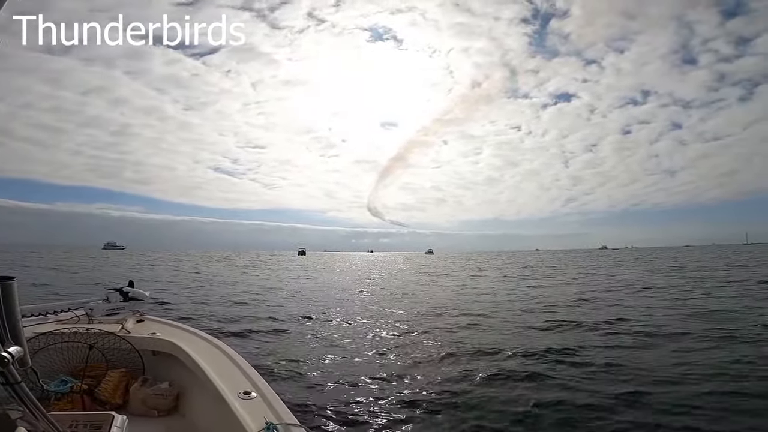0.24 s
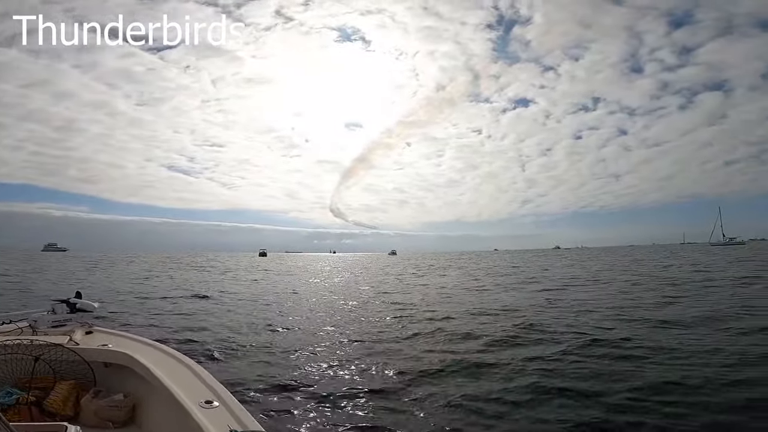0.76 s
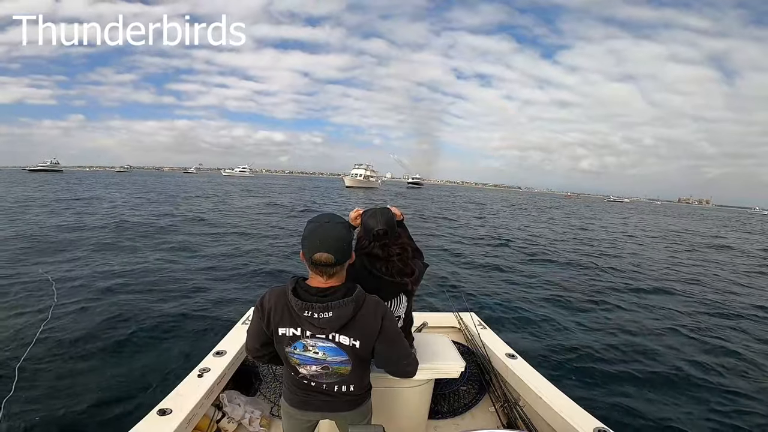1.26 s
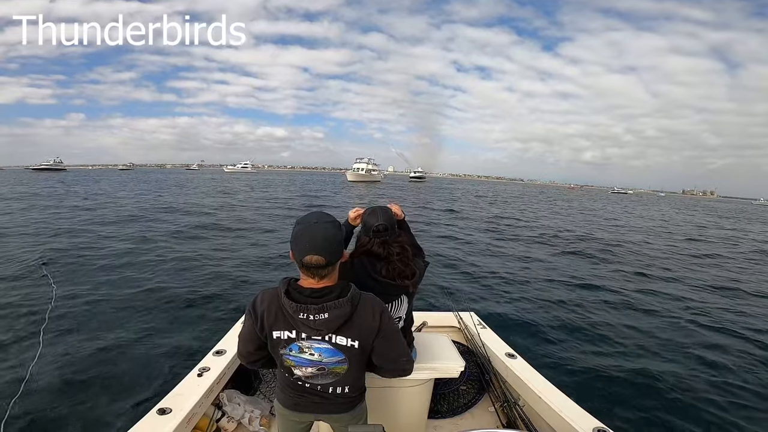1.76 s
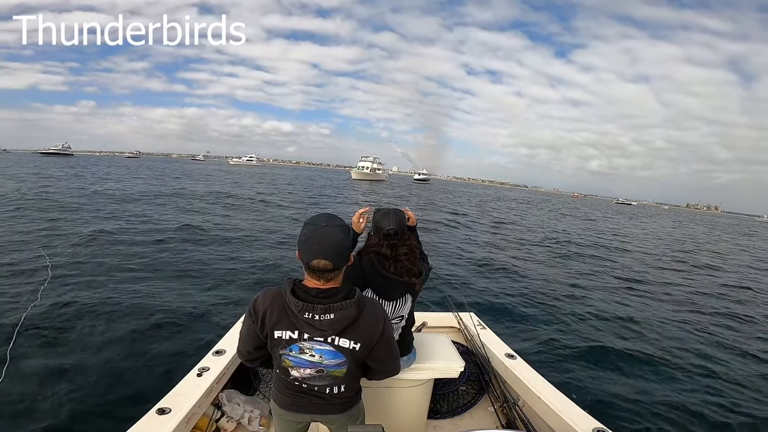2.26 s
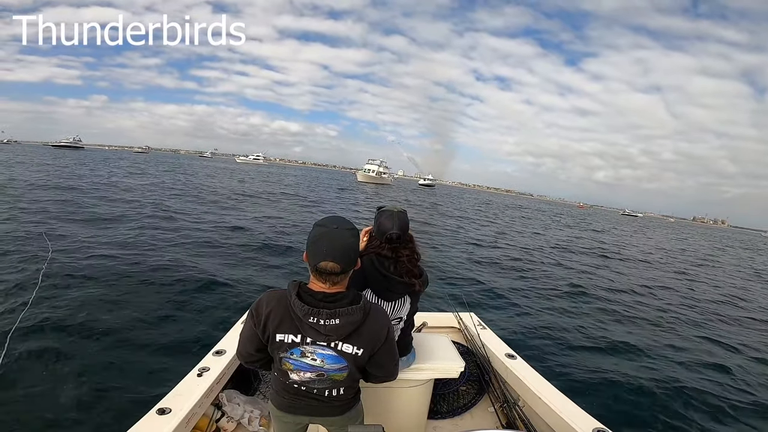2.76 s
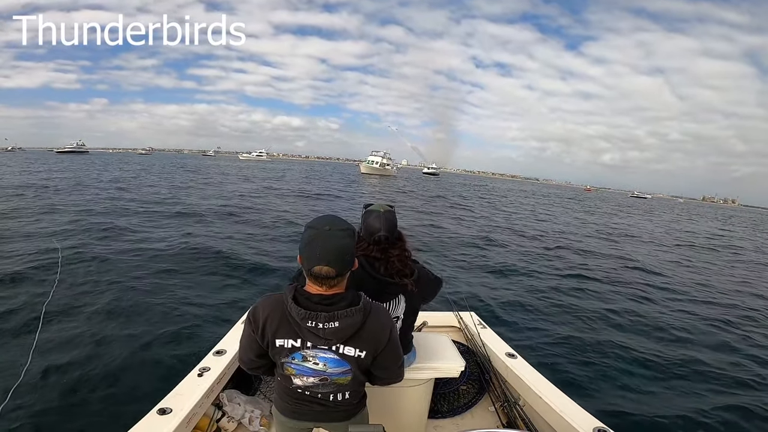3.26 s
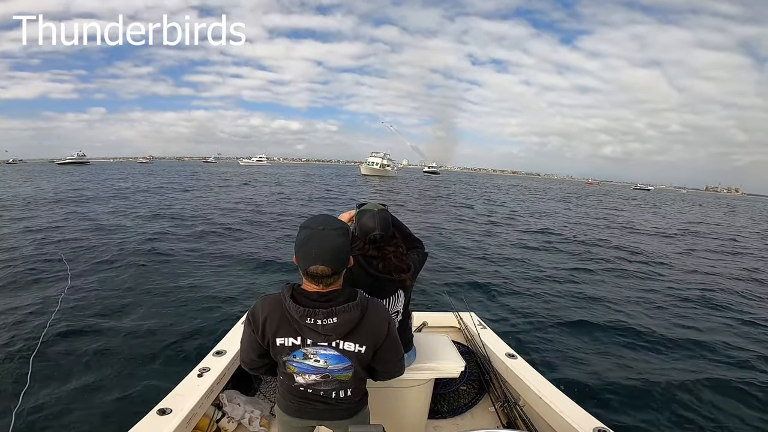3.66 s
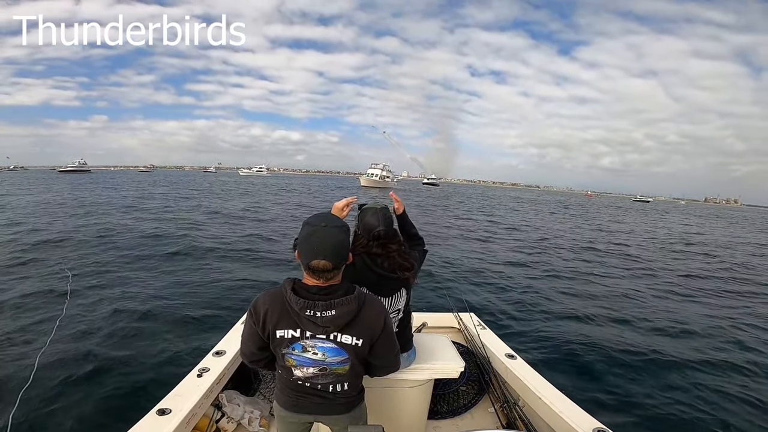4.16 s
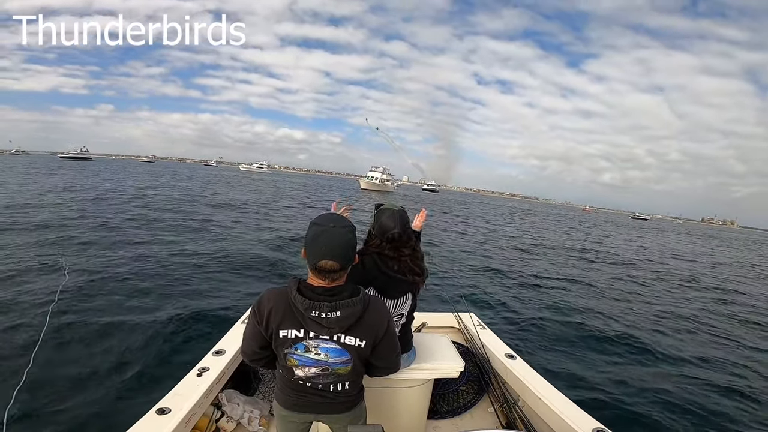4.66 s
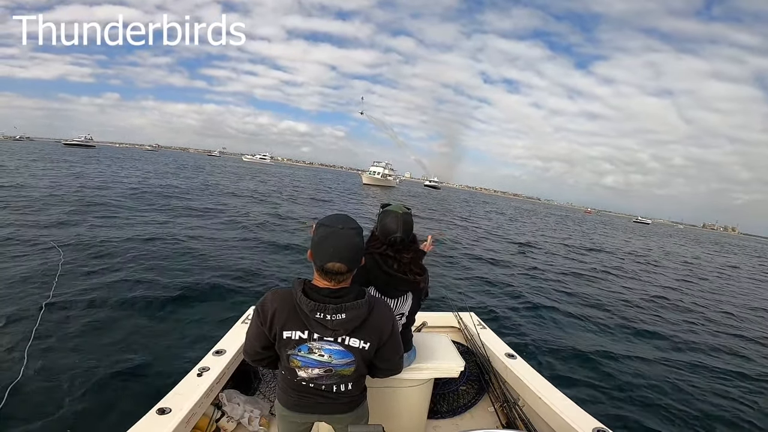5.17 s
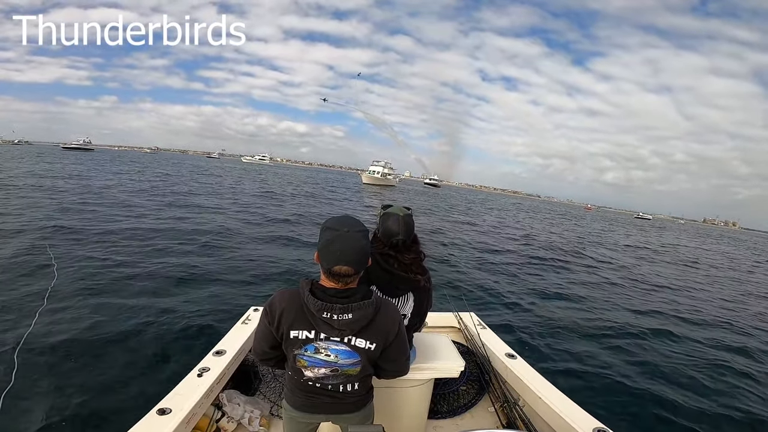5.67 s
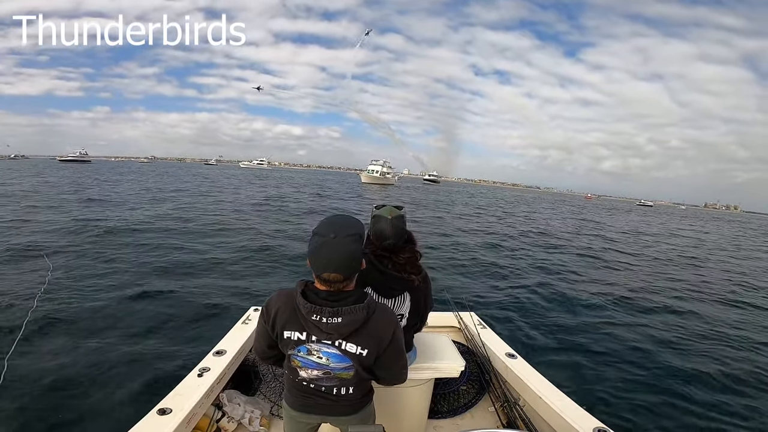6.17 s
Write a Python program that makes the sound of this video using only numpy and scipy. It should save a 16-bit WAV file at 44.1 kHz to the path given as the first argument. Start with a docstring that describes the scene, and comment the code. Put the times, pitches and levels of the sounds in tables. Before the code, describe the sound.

A jet's deep rumble cuts off abruptly; water slaps a small boat over far rumbling, then jets close in with howling, crackling roar.

```python
"""A jet rumbles away; then the scene changes and, heard from a small open boat, more jets close in at an air
show. Water laps at the hull throughout, with slaps, gulps of air and taps of loose gear over a far rumble. Jet
exhaust is filtered noise that swells and brightens; trains of pressure spikes add a harsh crackle. Unsteady
resonances make howls that mostly fall in pitch. A delayed copy of the roar and crackle, mirrored by the sea,
sweeps a comb-like hollowness through them as the jets climb."""
import sys
import numpy as np
from scipy import signal
from scipy.fft import rfft, irfft, next_fast_len
from scipy.io import wavfile
from scipy.ndimage import uniform_filter1d, minimum_filter1d, map_coordinates

SR = 44100
rng = np.random.default_rng(int(sys.argv[2]) if len(sys.argv) > 2 else 0)


def dump_mix(stems):
    """Bounce the given channels to the path in sys.argv[1] as a 16-bit WAV at rate SR."""
    frames = np.atleast_2d(stems).T  # one column per channel
    limited = np.clip(frames, -1, 1)  # hard clip at full scale
    pcm = np.round(limited * 32767).astype(np.int16)
    wavfile.write(sys.argv[1], SR, pcm)


N = 283122  # samples, about 6.42 s
TIME = np.arange(N) / SR  # s
CUT_S = 1.09  # the scene changes from the departing jet to the approach

# flight path: (time [s], elevation [degrees], average share of the sound that the sea mirrors [0-1])
CLIMB = [(0, 2, 0.28), (4.6, 7.4, 0.0023), (5.25, 4.3, 0.24), (5.55, 6.65, 0.28), (5.8, 7.8, 0.34),
         (6.0, 9.84, 0.32), (6.15, 12.24, 0.55), (6.42, 17.2, 0.7)]


def undb(db):
    """Turn decibels into gain."""
    return 10 ** (np.asarray(db) / 20)


def curves(table):
    """Draw each column after the time column as a curve with one value per sample."""
    s, *columns = np.transpose(table)
    return [np.interp(TIME, s, c) for c in columns]


def during(start_s, end_s, fade_s):
    """Stay at one from start to end, fading in before and out after."""
    outside = np.maximum(start_s - TIME, 0) + np.maximum(TIME - end_s, 0)
    return np.exp(-(outside / fade_s) ** 2)


def colour(x, points):
    """Filter a sound to follow a spectrum of (frequency [Hz], level [dB]) points."""
    hz, db = np.transpose(points)
    size = next_fast_len(N)
    f = np.maximum(np.fft.rfftfreq(size, 1 / SR), 1)
    # fall away below the first point and above the last
    beyond = np.minimum(f / hz[0], 1) ** 2 * np.minimum(hz[-1] / f, 1) ** 4
    gain = undb(np.interp(np.log(f), np.log(hz), db)) * beyond
    return irfft(rfft(x, size) * gain, size)[..., :N]


def band(x, lo_hz, hi_hz):
    """Keep one band of frequencies, without phase shift."""
    sos = signal.butter(4, [lo_hz, hi_hz], "band", fs=SR, output="sos")
    return signal.sosfiltfilt(sos, x)


def unit(x, lo_hz, hi_hz):
    """Scale a sound so that the given band has an rms level of 1."""
    return x / np.std(band(x, lo_hz, hi_hz))


def noise(points):
    """Make turbulent noise with the given spectrum."""
    return colour(rng.standard_normal(N), points)


def walk(rate):
    """Wander smoothly at random with spread 1, changing about rate times a second."""
    knots = rng.standard_normal(4096)
    x = map_coordinates(knots, [TIME * rate], order=3, mode="wrap")
    return x / np.std(x)


def sway(rate):
    """Wander at random in both strength and phase."""
    return walk(rate) + 1j * walk(rate)


def delayed(x, seconds):
    """Play the sound a little later; the delay may move."""
    return map_coordinates(x, [np.arange(N) - seconds * SR], order=3)


def air(x, treble_db, flutter_db, knee_hz=2400, span_hz=3300, most_db=4):
    """Air tilts the treble above a knee; eddies on the way make neighbouring bands flutter together."""
    f, t, z = signal.stft(x, SR, nperseg=512)
    tilt = np.outer(np.maximum(f - knee_hz, 0) / span_hz, np.interp(t, TIME, treble_db))
    tilt = np.minimum(tilt, most_db)  # limit how much treble can be raised
    places = np.meshgrid(np.sqrt(f / 250), t * 16, indexing="ij")
    eddies = map_coordinates(rng.standard_normal((64, 256)), places, order=3, mode="wrap")
    return signal.istft(z * undb(tilt + flutter_db * eddies), SR)[1][:N]


def departing_jet():
    """Seen from behind, the exhaust is a deep rumble under a dull roar that brightens and swells once."""
    # exhaust spectrum: (frequency [Hz], level [dB])
    exhaust_colour = [(15, -42), (25, -15), (88, 3.5), (128, 1.5), (246, -3), (344, -3.5), (402, -11),
                      (576, -14.5), (862, -35), (1290, -35.5), (1730, -42.5), (2160, -47), (3460, -62.5),
                      (5290, -94.5), (6880, -113), (11600, -120)]
    rumble_db, roar_db = -13.5, -35
    swell_db, swell_treble_db = 1.2, 5
    sinks_from_s, sink_db_per_s, brighten_db_per_s = 0.65, 8, 3
    swell = during(0.42, 0.68, fade_s=0.16)
    sink_db = sink_db_per_s * np.maximum(TIME - sinks_from_s, 0)
    treble_db = swell_treble_db * swell + brighten_db_per_s * np.minimum(TIME, CUT_S)
    plume = air(noise(exhaust_colour), treble_db, flutter_db=1.4, knee_hz=1200)
    low = band(plume, 13, 787)
    high = unit(plume - low, 900, 3500) * undb(roar_db + swell_db * swell)
    low = unit(low, 60, 500) * undb(rumble_db)
    return (low + high) * undb(-sink_db)


def lapping(grain_db=2, ripple_db=-62.0, slosh_db=3.0, lee_db=-4):
    """Small ripples fizz along the hull, and now and then a wavelet slaps it."""
    # water on the hull: (time [s], bubble pitch [Hz], level [dB], left minus right [dB], decay [s])
    hull_slaps = [(1.154, 1680, -38, 9, 0.022), (1.222, 3350, -45, 3, .008),
                  (1.426, 3600, -40.5, 1, 0.0046), (1.49, 2800, -45, 8, .005),
                  (1.554, 3240, -40, 4, 0.0075), (1.603, 4870, -45, 5, 0.017), (1.713, 2380, -44, 7, 0.017),
                  (1.737, 1400, -35, 3, 0.0063), (1.889, 2650, -43, 5, 0.032), (1.94, 3000, -42, 1, 0.047),
                  (2.011, 3840, -40.5, 6, 0.0096), (2.021, 1490, -32.5, 3, 0.03),
                  (2.06, 4200, -48, 1, .004), (2.172, 4160, -51, 7, 0.016), (2.373, 1900, -39, 1, 0.009),
                  (2.391, 2005, -39, 2, 0.0077), (2.401, 2200, -41.5, -2, 0.0047),
                  (2.469, 5500, -50, 6, 0.0067), (2.48, 2120, -41, 2, .007),
                  (2.512, 1750, -38.5, 15, 0.027), (2.535, 2560, -30, 7, 0.015),
                  (2.576, 4500, -39, 4, 0.018), (2.593, 2900, -33.5, 8, 0.012),
                  (2.636, 1300, -37, 3, 0.009), (2.655, 2100, -38, 6, .016), (2.788, 5355, -44, 3, .012),
                  (2.793, 2200, -40.5, 4, 0.037), (2.852, 1220, -35.5, 1, 0.0033),
                  (2.902, 2630, -44, 9, 0.024), (3.214, 2970, -43.5, 6, 0.0042),
                  (3.302, 2200, -36.5, 1, 0.023), (3.335, 1960, -24, 0, 0.022),
                  (3.373, 2650, -30, 2, 0.028), (3.485, 3100, -43, 3, 0.029), (3.55, 2830, -46, 3, 0.031),
                  (3.624, 3170, -39, 8, 0.013), (3.65, 4270, -55, 1, 0.028),
                  (3.846, 2810, -32.5, 6.5, 0.026), (3.897, 4130, -39, 3, 0.015),
                  (3.965, 4300, -44, 3, .008), (4.034, 4500, -43.5, 3, 0.026),
                  (4.118, 4800, -46, -2, 0.0025), (4.86, 6170, -44, -3, 0.0044)]
    # spectrum of the fizz: (frequency [Hz], level [dB])
    spray_colour = [(400, -13), (1000, 1), (1800, -0.5), (3300, -6), (5000, -8), (8000, -15.5),
                    (12000, -31.5)]
    # tone of the water heard past the boat's raised side: (frequency [Hz], level [dB])
    splash_shade = [(200, 8), (4500, -4), (6000, -6), (8000, -8), (11000, -17)]
    drops = rng.standard_normal((2, N)) * undb(grain_db * walk(600))
    sides = colour(drops, spray_colour)
    fizz = np.array([air(side, 0 * TIME, flutter_db=2.5) for side in sides])
    # the fizz is fainter during the departure
    fizz_db = ripple_db + slosh_db * walk(14) + lee_db * (TIME < CUT_S)
    water = unit(fizz, 1500, 8000) * undb(fizz_db)
    for s, hz, db, pan_db, decay_s in hull_slaps + wavelets():
        start = int(s * SR)
        side_db = np.array([[pan_db], [-pan_db]]) / 2
        splash = slap(hz, max(decay_s, .002), db)[:, :N - start] * undb(db + side_db)
        water[:, start:start + splash.shape[1]] += splash
    return colour(water, splash_shade)


def port_wind(level_db=-41):
    """A light breeze buffets each microphone separately with low noise."""
    wind_colour = [(18, -12.5), (40, 5), (100, -7.0), (300, -30.5)]  # (frequency [Hz], level [dB])
    gusts = np.array([noise(wind_colour) for _ in range(2)])
    return gusts / np.std(gusts) * undb(level_db + 2 * walk(1.0))


def howl(peak_s, rise_s, hold_s, fall_db_per_s, level_db, peak_hz, final_hz, glide_s,
         width_hz, octave_db, roughness, skirt_width=3.2):
    """Turbulence drives an engine resonance and its octave, which settle in pitch as the jet turns by."""
    age = TIME - peak_s
    bend = np.exp(-np.maximum(age, -2 * rise_s) / glide_s)
    hz = final_hz + (peak_hz - final_hz) * bend
    fall_db = fall_db_per_s * np.maximum(age - hold_s, 0)
    envelope = during(peak_s, TIME[-1], rise_s) * undb(level_db - fall_db)
    turn = np.exp(2j * np.pi * np.cumsum(hz) / SR)
    core = sway(width_hz)
    # a clean resonance saturates, which evens out its swells
    core = core / (0.18 + np.abs(core)) ** np.clip(1 - 2 * roughness, 0, 1)
    skirts = sway(skirt_width * width_hz)  # faster wandering spreads the tone wider
    tone = (core / np.std(core.real) + roughness * skirts) * turn
    tone = tone + undb(octave_db) * skirts * turn ** 2
    return tone.real / np.hypot(1, roughness) * envelope


def elevation():
    """Give the sine of the jets' angle above the horizon."""
    return np.sin(np.radians(curves(CLIMB)[0]))


def far_rumble(level_db=-23.5, waver_db=-1, overhead_db=10.5):
    """Mostly the bass of distant jets carries over the water; it grows as they rise in the sky."""
    # bass-heavy spectrum of the far jets: (frequency [Hz], level [dB])
    rumble_colour = [(22, -17.5), (42, -3), (71, -4.5), (125, 0), (155, -1.5), (182, -6.5), (222, -7),
                     (270, -13), (400, -25), (600, -36), (1000, -44), (2200, -56.5), (4000, -66.5),
                     (7000, -88.5)]
    moving_db = level_db + waver_db * walk(9.7) + overhead_db * elevation()
    rumble = air(noise(rumble_colour), 0 * TIME, flutter_db=1.5)
    return unit(rumble, 30, 320) * undb(moving_db)


def wavelets(count=24, until_s=3.4, level_db=-53, scatter_db=2, pitch_hz=2000, decay_s=0.0099):
    """Faint slaps fall at random, in rows like those of the hull slaps."""
    times = rng.uniform(CUT_S, until_s, count)
    chance = np.clip(rng.standard_normal((count, 4)), -2, 2)
    rows = []
    for s, (a, b, c, d) in zip(times, chance):
        hz = pitch_hz * np.exp(0.47 * a)
        rows.append((s, hz, level_db + scatter_db * b, 4 * c, decay_s * np.exp(.5 * d)))
    return rows


def slap(hz, decay_s, level_db, bubbles_db=-1.5, spray_db=-5, splash_hz=700):
    """A gentle wavelet rings bubbles around one pitch; a hard one foams, scattering them in broad spray."""
    foam_from_db, foam_range_db, foam_shift_db = -48.5, 20, 4  # harder slaps trade bubbles for spray
    count, cycles = 22, 4.5  # bubbles, and how many turns each rings before fading to about a third
    foam = np.clip((level_db - foam_from_db) / foam_range_db, 0, 1)
    born = decay_s * rng.exponential(size=(count, 1))
    scatter = np.clip(rng.standard_normal((count, 1)), -2, 1.5)
    pitch = hz * np.exp((.16 + 0.23 * foam) * scatter)
    age = TIME[:6144]
    turns = np.maximum(age - born, 0) * pitch
    ringing = np.sin(2 * np.pi * turns) * np.exp(-turns / cycles) * (1 - np.exp(-turns))
    bubbles = np.sum(ringing * np.exp(-born / (2 * decay_s)), axis=0)  # later bubbles are weaker
    edges_hz = [min(hz / 3.5, splash_hz), min(hz * 1.5, 9000)]
    body = signal.butter(2, edges_hz, "band", fs=SR, output="sos")
    spray = signal.sosfilt(body, rng.standard_normal((2, len(age))))
    spray = spray * (1 - np.exp(-7 * age / decay_s)) * np.exp(-age / decay_s)
    return (undb(bubbles_db - foam_shift_db * foam) * bubbles / np.max(np.abs(bubbles))
            + undb(spray_db + foam_shift_db * foam) * spray / np.max(np.abs(spray)))


def gulps(glide=0.76, attack_s=0.00049):
    """Air trapped under the hull by a wave rings briefly, rising in pitch."""
    # air pockets: (time [s], starting pitch [Hz], level [dB], decay [s])
    air_pockets = [(1.157, 588, -31, 0.011), (2.025, 544, -30, 0.011), (2.907, 230.5, -17.5, 0.034),
                   (3.965, 239, -12.5, 0.023)]
    out = 0
    for s, hz, db, decay_s in air_pockets:
        age = np.maximum(TIME - s, 0)
        tone = np.sin(2 * np.pi * hz * age * (1 + glide * age / 2))
        out = out + undb(db) * tone * np.exp(-age / decay_s) * (1 - np.exp(-age / attack_s))
    return out


def knocks():
    """Loose gear taps the deck, ringing a few short tones at once."""
    # taps: (time [s], level [dB])
    taps = [(1.427, -46.5), (2.535, -29.5), (3.626, -53), (4.013, -45), (4.333, -44), (4.635, -43)]
    # ringing tones of each tap: (pitch [Hz], level within the tap [dB], time to fall by 60 dB [s])
    tap_modes = [(1430, -4, 0.024), (2350, -7.5, 0.013), (3180, -2.5, 0.015), (4150, -12, 0.021),
                 (6870, -20, .018)]
    out = 0
    for s, db in taps:
        age = np.maximum(TIME - s, 0)
        for hz, mode_db, t60 in tap_modes:
            out = out + undb(db + mode_db - 60 * age / t60) * np.sin(2 * np.pi * hz * age)
    return out


def mixing_roar(lead_in_s=0.46, flutter_db=0.87):
    """Exhaust mixes with air: large eddies make the core of the roar, small ones its surging upper part."""
    # approaching jets: (time [s], level [dB], upper roar against the core [dB], treble tilt [dB])
    roar_course = [(3.45, -53, -7, -1.5), (3.78, -50, -8, -2), (3.9, -41, -7, 0), (4.17, -37, -13, -7),
                   (4.4, -34, -7.5, -11), (4.57, -35.5, -14, 4), (4.74, -29.5, -9.5, -0.5),
                   (4.86, -31, -8.5, -2), (4.98, -30.5, -10, 3), (5.15, -31, -12, 1.5),
                   (5.24, -30.5, -9, -2), (5.47, -33, -9, 4), (5.65, -31, -0.5, -7), (5.8, -29.5, -9, -0.5),
                   (6.1, -29.5, -8, 2.5), (6.42, -30.5, -10.5, 5)]
    # exhaust spectrum: (frequency [Hz], level [dB])
    roar_colour = [(120, -13), (270, -4.5), (420, 6.5), (560, -2.5), (690, -1), (840, -4), (980, -0.5),
                   (1200, -11.5), (1400, -13.5), (2200, -21), (3400, -31), (4200, -41.5), (5300, -63),
                   (7500, -94.5)]
    level_db, upper_db, tilt_db = curves(roar_course)
    plume = air(noise(roar_colour), 0 * TIME, flutter_db)
    low = band(plume, 15, 1300)
    high = unit(plume - low, 1500, 3200)
    low = unit(low, 800, 1300)
    high = air(high, tilt_db, flutter_db=0.5, knee_hz=2000, span_hz=1500) * undb(upper_db)
    return (low + high) * undb(level_db) * during(roar_course[0][0], TIME[-1], lead_in_s)


def spikes(starts, strength, width_s, steepening=0.18, trough=0.3, trough_s=0.00039):
    """Each shock is a pressure spike and a shallow trough of suction; stronger spikes are narrower."""
    index = (starts * SR).astype(int)[:, None] + np.arange(-160, 161)
    age = index / SR - starts[:, None]
    spike = 1 / (1 + (age / width_s * strength[:, None] ** steepening) ** 2)
    after = np.maximum(age, 0) / trough_s
    shapes = strength[:, None] * (spike - trough * after * np.exp(1 - after))
    shapes = shapes * np.hanning(index.shape[1])
    # add up overlapping shocks; early ones land on the first sample, late ones are dropped
    return np.bincount(np.clip(index, 0, N).ravel(), shapes.ravel(), N + 1)[:N]


def shock_crackle(width_s=0.000098, lead_in_s=0.041, hiss_db=-20, crack_db=-5.5):
    """Exhaust shocks arrive as dense, irregular snaps over a tearing hiss, with hard single cracks."""
    # course of the crackle: (time [s], level [dB], treble tilt [dB])
    crackle_course = [(5.25, -37.5, -42), (5.47, -37, -22.5), (5.65, -33, -15.5), (5.74, -38.5, -13),
                      (5.94, -34, -7.5), (6.15, -34, -1.5), (6.42, -33, -7)]
    # spectrum of the shocks: (frequency [Hz], level [dB])
    shock_colour = [(100, -11), (270, -10.5), (700, -4), (1400, 0.5), (2200, -3.5), (3500, 1), (5000, 0),
                    (7000, -3), (10000, -10), (14000, -29.5)]
    # volleys of steeper shocks: (start [s], length [s], treble lift [dB])
    volleys = [(5.276, 0.011, 9), (5.352, 0.012, 13), (5.4, 0.0096, 9), (5.466, .03, 8), (5.544, 0.018, 11),
               (5.585, .025, 11), (5.668, .02, 2.5), (5.724, 0.023, 10), (5.799, 0.0027, 8),
               (5.822, 0.07, 8.5), (5.993, 0.045, 5), (6.15, 0.076, 2.5), (6.345, .015, 1.5)]
    # the hardest single shocks: (time [s], strength before crack_db [dB])
    hard_shocks = [(5.355, -17.5), (5.4901, -9.5), (5.5355, -8.1), (5.549, -3), (5.5553, -9.5),
                   (5.5637, -7), (5.588, -8), (5.6038, -11.5), (5.611, -9), (5.835, -5.5), (5.8488, -10.5),
                   (5.8531, -2), (5.8659, -5.4), (5.8764, -6), (5.887, -1.5), (5.8903, -8), (5.8969, -2),
                   (5.9015, -11), (5.9686, -8), (5.9924, -3.5), (5.9975, -2), (6.007, 0.5), (6.0303, 1),
                   (6.038, -3.5), (6.0527, -2.5), (6.1021, -5.5), (6.1196, -3), (6.1357, -3.5),
                   (6.1427, -3.5), (6.1477, -4), (6.1579, -4.5), (6.1635, -4.5), (6.175, 2.5),
                   (6.1793, -3.5), (6.1823, -1.5), (6.1914, -3), (6.2215, -9), (6.2264, -4.1), (6.2647, -6),
                   (6.3417, -6), (6.366, 1), (6.3918, -5)]
    # spectrum of the hiss: (frequency [Hz], level [dB])
    tearing_colour = [(500, -10), (1400, -2.5), (2200, -18.5), (3500, -4), (5000, -2.5), (7000, -14),
                      (10000, -25.5), (14000, -52)]
    volley_loudness = 0.31  # a volley's level rises by this share of its treble lift
    level_db, tilt_db = curves(crackle_course)
    volley_db = sum(db * during(s, s + length_s, fade_s=0.0073) for s, length_s, db in volleys)
    count, rate, regularity, scatter_db = 3800, 540, 2, 5.5  # rate in shocks per second
    starts = np.cumsum(rng.gamma(regularity, 1 / regularity, count)) / rate
    strength = undb(scatter_db * np.minimum(rng.standard_normal(count), 1.4))
    snaps = colour(spikes(starts, strength, width_s), shock_colour)
    hiss = unit(noise(tearing_colour), 1800, 4000)
    train = unit(snaps, 1800, 4000) + undb(hiss_db) * hiss
    treble_db = np.minimum(tilt_db + volley_db, 0)  # the sharpest volleys arrive unblunted
    gain = undb(level_db + volley_loudness * volley_db)
    gain = gain * during(crackle_course[0][0], TIME[-1], lead_in_s)
    crack_s, strength_db = np.transpose(hard_shocks)
    cracks = colour(spikes(crack_s, undb(strength_db), width_s=7e-5), shock_colour)
    return air(train, treble_db, flutter_db=1.5) * gain + undb(crack_db) * cracks


def over_sea(x, swell_db=4.0, glassy_hz=3000, treble_loss_db=-5, overhead_lag_ms=6.11):
    """The sea adds a mirrored copy, later the higher the jets are; waves make it waver and dull."""
    share = np.clip(curves(CLIMB)[1] * undb(swell_db * walk(12)), 0, 1)
    sea_colour = [(10, 0), (glassy_hz, 0), (6000, treble_loss_db), (14000, 2 * treble_loss_db)]
    mirrored = colour(x, sea_colour)
    return x + share * delayed(mirrored, overhead_lag_ms * elevation() / 1000)


def on_boat(x, lag_s=5e-5, shade_hz=3300, scatter_s=.014, scatter_db=-21, bass_lean=0.085):
    """Two close microphones: sound reaches the right one first, and the deck scatters a little between."""
    size = next_fast_len(N)
    f = np.fft.rfftfreq(size, 1 / SR)
    # the phase difference levels off in the treble
    phase = 2 * np.pi * lag_s * shade_hz * np.tanh(f / shade_hz)
    left = irfft(rfft(x, size) * np.exp(-1j * phase), size)[:N]
    age = TIME[:2048]
    deck = rng.standard_normal(len(age)) * np.exp(-age / scatter_s)
    scattered = signal.fftconvolve(x, deck / np.linalg.norm(deck))[:N]
    deck_colour = [(30, 0.5), (130, 2.0), (500, 8.5), (2000, 12.0), (4500, 11.5), (10000, 6)]
    side = undb(scatter_db) * colour(scattered, deck_colour)
    side = side + bass_lean * band(x, 15, 350)
    return np.array([left + side, x - side])


def scene():
    """The departing jet gives way at once to the approach, while water and breeze go on."""
    # engine howls and fan whines: (peak time [s], rise [s], hold [s], fall [dB/s], level [dB],
    # pitch at the peak [Hz], final pitch [Hz], glide [s], width [Hz], octave level [dB], roughness [0-1])
    howl_rows = [(0.64, .06, 0.23, 1, -56.5, 2904, 2740, 0.12, 200, -41.5, .3),
                 (3.95, .45, 0.11, 26, -34.5, 359.7, 351, 0.31, 219, -30.5, 0.5),
                 (3.96, .125, 0.13, 118, -23, 654, 662.6, 0.29, 170, -20.5, 0.47),
                 (5.02, .06, 0.29, 65, -22, 679, 545, 0.28, 219.8, -35, .3),
                 (5.196, 0.044, .02, 75.5, -47, 3630, 3500, 0.13, 472, -52, 0.4),
                 (5.36, .19, 0.11, 66.5, -16, 408, 350.2, .23, 65.91, -38, 0.28),
                 (5.679, .05, 0.3, 40, -21.5, 365.8, 345, 0.23, 47.97, -40.5, 0.32),
                 (6.3, .12, 0.1, 17, -21.5, 479.2, 420, 0.19, 200.5, -23, .5)]
    departure = departing_jet() + sum(howl(*row) for row in howl_rows if row[0] < CUT_S)
    near_howls = sum(howl(*row) for row in howl_rows if row[0] >= CUT_S)
    jets = far_rumble() + over_sea(mixing_roar() + shock_crackle()) + near_howls
    approach = jets + gulps() + knocks()
    after = .5 + .5 * np.tanh((TIME - CUT_S) / 0.0004)
    return on_boat((1 - after) * departure + after * approach) + lapping() + port_wind()


def record(dry, fade_s=0.00081, top_hz=13500):
    """A limiter eases the loudest swells down, the top is cut and the end fades very briefly."""
    ceiling, hold = .76, int(.006 * SR)  # peak level, and samples in 6 ms
    allowed = ceiling / np.maximum(np.max(np.abs(dry), axis=0), ceiling)
    gain = uniform_filter1d(minimum_filter1d(allowed, hold), hold)
    gain = gain * np.tanh((TIME[-1] - TIME) / fade_s)
    low_pass = signal.ellip(8, .2, 70, top_hz, fs=SR, output="sos")
    return signal.sosfilt(low_pass, dry * gain)


dry = scene()
out = record(dry)
dump_mix(out)
```